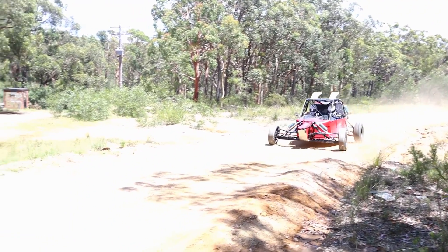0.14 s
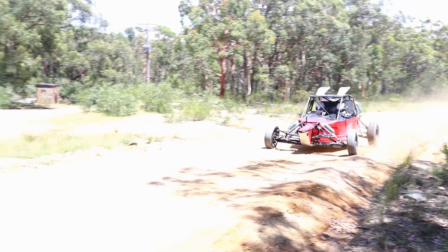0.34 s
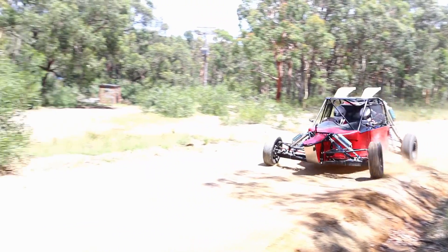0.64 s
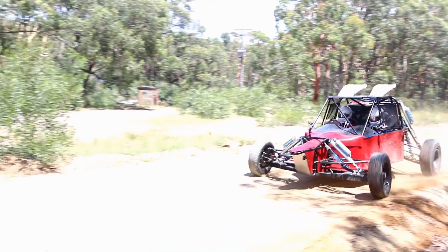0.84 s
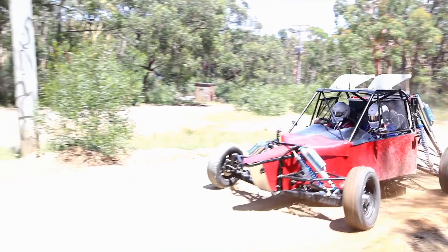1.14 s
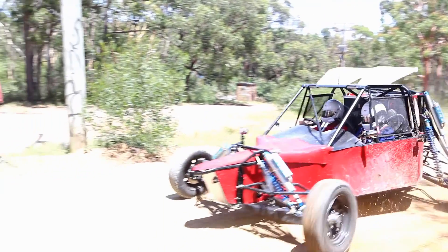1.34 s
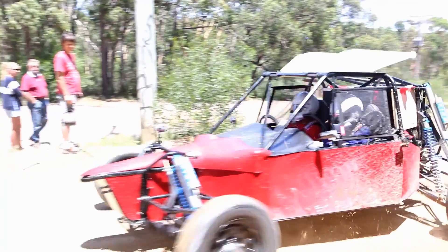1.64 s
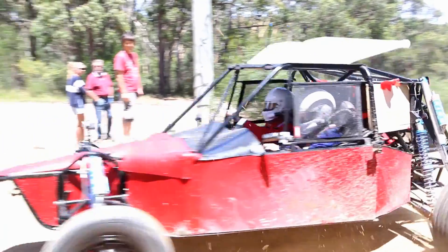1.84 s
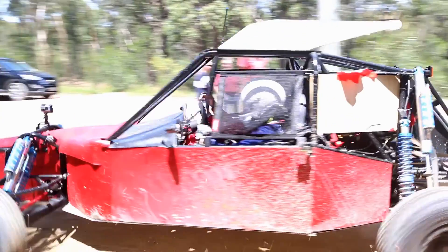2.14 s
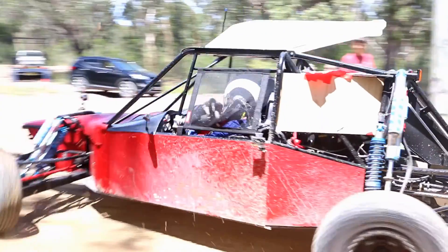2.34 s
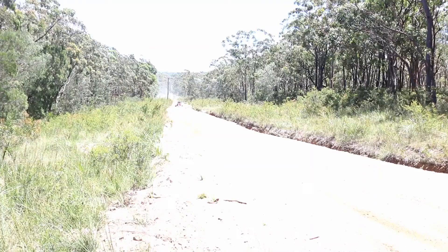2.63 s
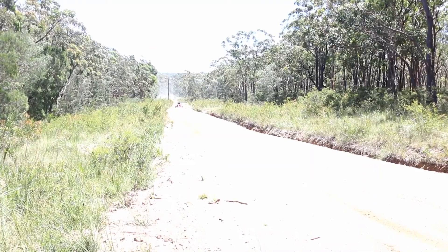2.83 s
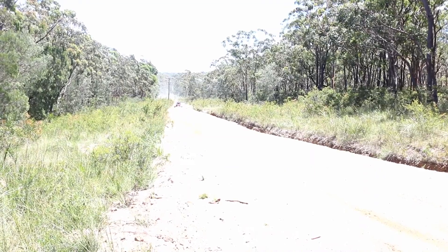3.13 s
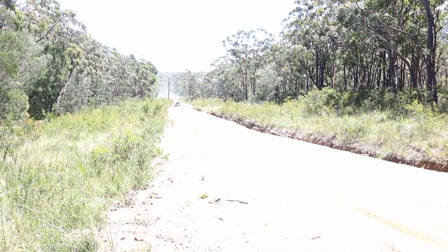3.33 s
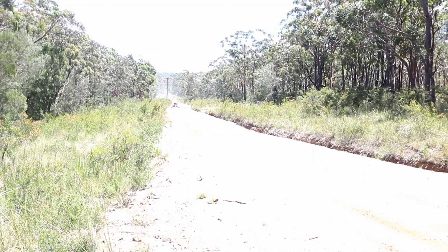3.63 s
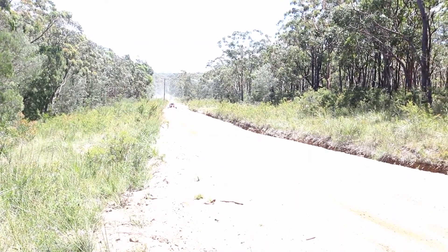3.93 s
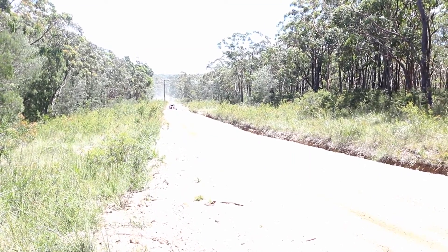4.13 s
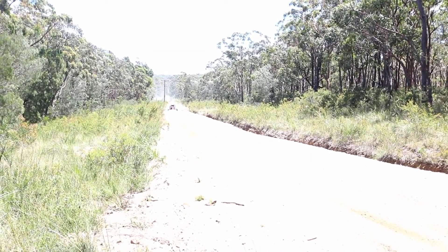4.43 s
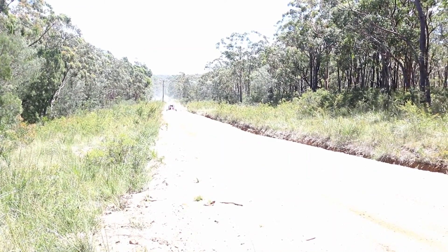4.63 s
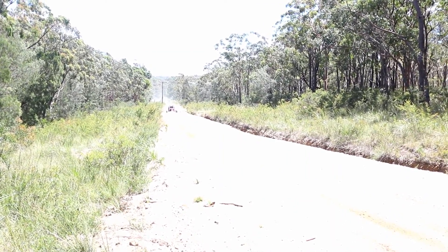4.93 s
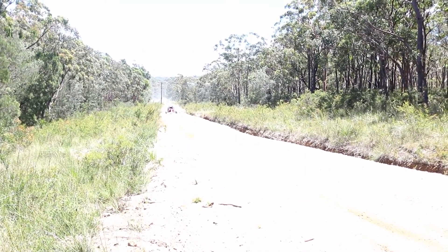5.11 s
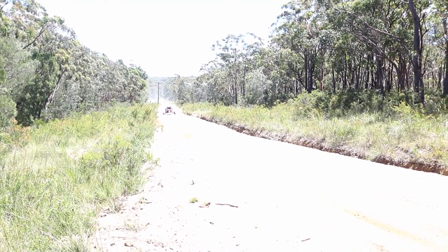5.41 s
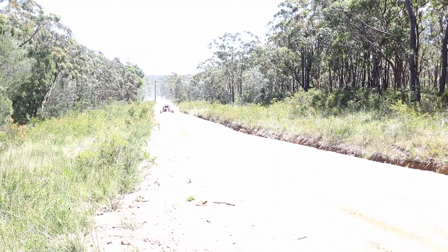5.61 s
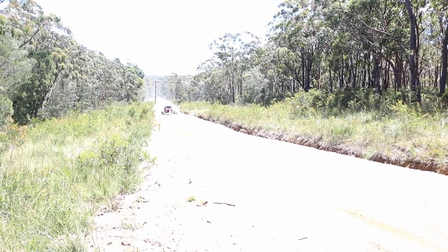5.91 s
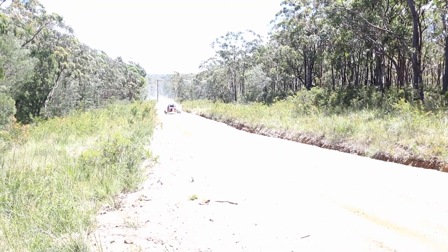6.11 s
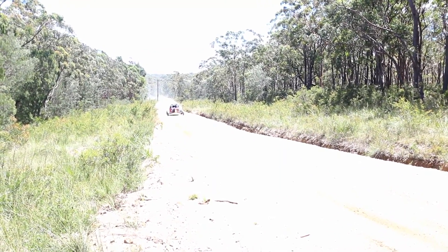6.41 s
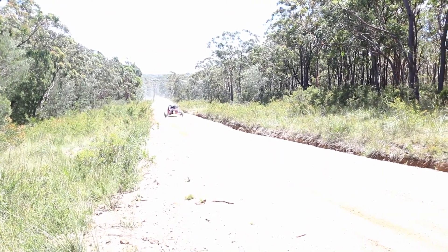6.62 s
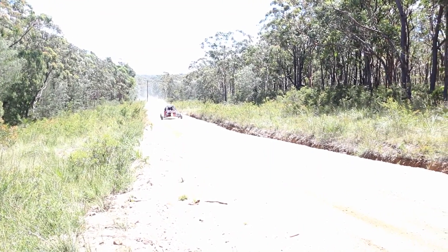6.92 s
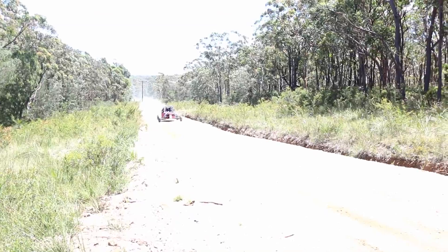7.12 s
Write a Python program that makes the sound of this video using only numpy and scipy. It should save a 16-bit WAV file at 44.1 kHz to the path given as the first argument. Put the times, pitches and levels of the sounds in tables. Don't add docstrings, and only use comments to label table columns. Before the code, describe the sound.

Outdoors on dirt, an eight-cylinder buggy coasts past a few metres from a stereo microphone pair, its low uneven exhaust falling in pitch. Tyres scrub and grab at ruts, stones tick on panels, a sharp throttle blip barks, brakes faintly squeal, then the engine pulls with tinny knocks. An abrupt cut leads to a distant engine revving high, shifting gear and approaching with tyre roar, faint insect rasps and a breeze.

```python
import sys
import numpy as np
from scipy import signal
from scipy.fft import rfft, irfft, next_fast_len
from scipy.io import wavfile
from scipy.ndimage import uniform_filter1d

SR = 44100
rng = np.random.default_rng(int(sys.argv[2]) if len(sys.argv) > 2 else 0)


def makeup_ratio(level_db):
    decades = np.asarray(level_db, float) / 20
    return 10 ** decades


def wav_out(sig):
    wavfile.write(sys.argv[1], SR, np.round(np.clip(np.atleast_2d(sig).T, -1, 1) * 32767).astype(np.int16))


N = 320166
T = np.arange(N) / SR
SCENE_CHANGE_S = 2.706

# time_s, engine_cycles_hz
NEAR_SPEED = [(0, 22.5), (.23, 21.5), (.4, 19.6), (.68, 16.2), (.89, 14.5), (1.0, 13.8), (1.12, 18.6),
              (1.19, 17.8), (1.46, 15.6), (1.78, 13.1), (2.26, 9.87), (2.64, 11.76)]
# time_s, load_0_to_1
NEAR_LOAD = [(0, 0), (.98, 0), (1, .4), (1.12, .4), (1.15, 0), (2.21, 0), (2.25, .8), (2.45, 1), (2.7, 1)]
# coasting_strength, pulling_strength, extra_pipe_delay_ms
NEAR_CYLINDERS = [(.64, .12, 1.56), (.08, .15, -2), (1.2, 1.1, 1.8), (.08, .55, .14), (.26, .25, 3.5),
                  (.03, .1, 0), (.53, .48, -1.9), (.31, .2, -3)]
FAR_CYLINDERS = [(1.05, 0, .9), (.55, .76, -.55), (.15, .9, .47), (.05, 1.2, -.39), (.2, .85, 0),
                 (.3, .96, -.14), (.3, .23, 0), (.45, .69, -.25)]
# frequency_hz, level_db
NEAR_PIPE = [(25, -48.5), (40, -47), (58, -22.5), (100, -17.5), (120, -5.5), (140, -0.5), (165, -2),
             (190, 0.5), (207, 0), (235, -11.5), (265, -12), (300, -19.5), (350, -28.5), (450, -34.5),
             (900, -68), (3000, -125)]
FAR_PIPE = [(40, -60), (70, -24.5), (100, -9), (125, -1.5), (150, 0), (195, 1), (250, 1), (300, 0.5),
            (350, -8.5), (420, -17.5), (500, -23), (600, -26.5), (900, -28), (1400, -78), (3500, -125)]
# frequency_hz, level_db
BANG_PIPE = [(40, -43), (100, -14), (150, -3), (185, -2.5), (212, 5.5), (245, -4.5), (320, -19), (500, -38),
             (3000, -125)]
# multiple_of_cycle_rate, level_under_exhaust_db
PULL_ORDERS = [
    (6, -18.5),
    (10, -34),
]
# frequency_hz, level_db
SCRUB = [(210, -35), (350, -7.5), (438, -23), (475, -20), (579, -13.5), (718, -3), (984, 1.5), (1050, 0.5),
         (1190, -16.5), (1460, -11.5), (1910, -19), (2270, -18.5), (3000, -27), (3900, -39), (6600, -120)]
DUST = [(180, -17), (330, 1), (740, -16), (1000, -12), (2070, -20), (4570, -23), (8300, -34), (11000, -46),
        (15500, -70)]
ROAR = [(240, -28.5), (400, -2.5), (448, -3.5), (517, -10), (622, -7.5), (863, -12), (4620, -30),
        (7940, -39.5), (12000, -63.5), (15600, -100), (22000, -120)]
# frequency_hz, level_db
AIR = [(12, -93), (20, -54), (95, -7.5), (144, -21), (202, -2), (315, -24.5), (549, -32.5), (667, -22),
       (15500, -84)]
WIND = [(15, -25), (40, -15), (75, 4), (110, -3), (200, -34.5)]
# frequency_hz, likeness_0_to_1
PORT_LIKENESS = [(30, .9), (125, .99), (700, .99), (1400, .96), (2800, .82), (5600, .6), (11000, .45)]
# frequency_hz, left_right_db
NEAR_BALANCE = [(500, 1.5), (2400, -1.5), (4400, -4), (8100, -8), (15000, -24.5)]
FAR_BALANCE = [(500, 2.5), (1300, 2), (4400, -3), (15000, -7.5)]
# peak_s, extra_db, rise_s, fall_s
GUSTS = [
    (2.87, 9.5, 0.075, 0.29),
    (4.899, 0.5, 0.4, 0.67),
    (6.8, 13, 0.54, .4),
]
# time_s, peak_db, ring_hz,
# left_right_db
STONES = [(0.0005, -47, 5770, -0.5), (0.1166, -66, 3740, -1.5), (0.145, -57, 3340, -1),
          (0.163, -44, 5430, 2), (0.219, -65.5, 3100, -8.5), (0.2373, -52.5, 3030, -7),
          (0.356, -50.5, 9020, -6.5), (0.3437, -47.5, 3050, -3), (0.375, -43.5, 5190, 1.5),
          (0.421, -43, 5040, 3), (0.4838, -40, 5480, 0), (0.5115, -45, 3060, -6), (0.535, -55.5, 3500, -6),
          (0.632, -55, 3070, -6), (0.649, -48.5, 7000, -3), (0.715, -53.5, 14800, -14),
          (0.7385, -60, 4730, -15.5), (0.702, -60.5, 3850, -16), (0.784, -56, 3150, -8),
          (0.9023, -43.5, 6920, -4.5), (0.9358, -56, 3320, -7), (0.9746, -57, 11950, -6.5),
          (1.04, -49.5, 3500, -9), (1.0152, -51.5, 3300, -12), (1.265, -45.5, 3590, -6),
          (1.3503, -48, 3600, -4), (1.539, -57, 4240, 6), (1.583, -58, 3020, -5), (1.594, -43.5, 4570, 4),
          (1.7029, -55.5, 4130, -3), (1.7249, -53.5, 3580, -6), (1.768, -51, 3110, -6),
          (1.911, -45.5, 6200, 6), (1.973, -46.5, 5060, 3.5), (2.156, -48.5, 5900, -6),
          (2.31, -52.5, 3450, -6), (2.3488, -55, 4410, -4), (2.498, -58, 4470, -14.5),
          (2.5414, -60, 7930, -11.5), (2.5889, -48.5, 4200, -11), (2.672, -53.5, 4240, -19),
          (2.704, -54, 2990, -3), (6.909, -66, 5800, 10.5), (6.999, -69.5, 6500, -16),
          (7.216, -58, 5950, 3)]
# start_s, length_s, scrub_db
SLIDES = [(0.207, 0.083, -44.5), (0.337, 0.2, -40), (0.66, 0.062, -42.5), (0.816, 0.13, -42.5),
          (0.988, 0.14, -44), (1.128, 0.16, -40.5), (1.319, 0.25, -44.5)]
# frequency_hz, peak_s, level_db, rise_s, fall_s
TREAD = [
    (1390, 0.46, -53, 0.46, 0.43),
    (457, 1.5, -52.5, 0.73, 0.21),
    (1000, 1.26, -49, 0.065, 0.13),
    (760, .38, -49, .15, .2),
]
# time_s, peak_db
GRABS = [(0.137, -49), (0.168, -38), (0.189, -45), (0.235, -34), (0.316, -36), (0.34, -27.5), (0.381, -27),
         (0.434, -32), (0.454, -25), (0.499, -27), (0.529, -37), (0.633, -32), (0.667, -28), (0.69, -34),
         (0.984, -33), (1.057, -35.5), (1.118, -36), (1.179, -28.5), (1.213, -26), (1.236, -26),
         (1.472, -34), (1.512, -31.5), (1.581, -39)]
# time_s, peak_db
BLIP_BANGS = [(0.999, -28), (1.02, -24.5), (1.038, -24), (1.054, -20.5), (1.069, -25), (1.082, -25),
              (1.091, -23.5), (1.097, -21), (1.11, -24), (1.117, -25)]
# time_s, frequency_hz, level_db
SQUEAL = [
    (1.7, 4770, -87.5),
    (1.78, 4660, -72),
    (2.14, 4640, -77),
    (2.2, 4590, -88),
    (2.32, 4330, -75),
    (2.7, 4300, -71),
]
# time_s, peak_db, ring_hz
KNOCKS = [(2.357, -51, 1010), (2.407, -49.5, 935), (2.456, -45.5, 1040), (2.498, -46.5, 1010),
          (2.541, -48.5, 953), (2.587, -43, 1096), (2.628, -40, 930), (2.671, -42, 894)]
# time_s, engine_cycles_hz
FAR_ENGINE_SPEED = [(2.71, 28.2), (2.93, 32.1), (3.15, 32.9), (3.47, 39.1), (3.54, 43.4), (3.68, 41.5),
                    (3.86, 44.8), (4.12, 41.5), (4.22, 29.7),
                    (4.38, 26.6), (4.56, 26.1), (4.68, 24.7), (5.08, 26.8), (5.51, 27.7), (5.7, 29.3), (6.1, 31.6),
             (6.28, 36.3), (6.55, 37), (6.66, 36.5), (6.81, 38.3), (6.94, 40.7), (7.26, 37.2)]
# time_s, load_0_to_1
FAR_LOAD = [(2.7, 1), (3.5, 1), (3.6, .7), (3.75, .7), (3.8, .08), (4.13, .08), (4.16, 1), (6.85, 1),
            (6.96, 0), (7.26, 0)]
# time_s, full_load_level_db
FAR_LEVEL = [(2.71, -49.5), (3.25, -49), (3.46, -46.5), (3.74, -48), (4.3, -50), (5.4, -42), (6.56, -35.5),
             (7.22, -39), (7.26, -44.5)]
# time_s, share_0_to_1
FAR_EVEN = [(2.7, .1), (4.3, .15), (5, .2), (5.4, .45), (6, .5), (6.5, .35), (6.85, .55), (6.96, 0)]
# time_s, spread_of_strength
FAR_ROUGH = [(2.7, .15), (4.5, .18), (4.7, .14), (5.7, .13), (6.2, .17), (6.9, .14), (7, .12)]
BUMPS = [5.71, 5.84, 5.97, 6.1, 6.21, 6.3, 6.43, 6.56, 6.7]
# start_s, end_s, level_db
THROTTLE_CUTS = [
    (3.594, 3.642, -15.5),
    (4.115, 4.133, -5),
]
# time_s, fourth_under_exhaust_db, fifth_under_exhaust_db
FAR_ORDERS = [(2.7, -7.5, -4), (3.3, -3, -8.5), (4.6, -13, -12), (5.3, -11, -17), (5.7, -15, -9.5),
              (6.5, -18, -14.5)]
# peak_s, extra_db, rise_s, fall_s
LOOSE = [
    (3.72, 8.5, 0.8, 0.39),
    (6.7, 10.5, 1.0, 0.51),
]

NEAR_LAG_S, FAR_LAG_S = 50e-6, -30e-6
ROLL_DB, GRIP_DB = -62, 7


def evened(x):
    return x / np.sqrt(np.mean(x ** 2) + 1e-20)


def smooth(x, size):
    return uniform_filter1d(uniform_filter1d(x, size), size)


def steady(x, size):
    power = smooth((x ** 2).mean(0), size)
    return x / np.sqrt(abs(power) + 1e-20)


def curves(rows):
    s, *columns = np.transpose(rows)
    return [np.interp(T, s, c) for c in columns]


def hump(peak, rise, fall):
    distance = np.where(T < peak, (peak - T) / rise, (T - peak) / fall)
    return np.cos(np.pi / 2 * np.clip(distance, 0, 1)) ** 2


def swells(rows):
    return sum(db * hump(s, rise, fall) for s, db, rise, fall in rows)


def tone(order, cycles):
    return np.sin(2 * np.pi * order * cycles)


def read(points, hz):
    f, value = np.transpose(points)
    return np.interp(np.log(hz + 1), np.log(f + 1), value)


def causal(x, spectrum, size=16384):
    db = np.maximum(read(spectrum, abs(np.fft.fftfreq(size, 1 / SR))), -130)
    log_gain = db * np.log(10) / 20
    taps = np.fft.ifft(np.exp(np.conj(signal.hilbert(log_gain)))).real[:size // 2]
    return signal.oaconvolve(x, taps)[:N]


def impulse_response(spectrum):
    return causal(1. * (T == 0), spectrum)


def noise(spectrum, balance, lag, seconds, patchy_db, flicker_db):
    frames, hz = int(seconds * SR) // 256 + 5, np.fft.rfftfreq(1024, 1 / SR)
    a, b, c, d, patches = rng.standard_normal((frames, 513, 5)).T
    patches = evened(uniform_filter1d(uniform_filter1d(patches, 8, 0), 6, 1))
    same = np.clip(read(PORT_LIKENESS, hz), -1, 1)[:, None]
    left = a + 1j * b
    delay = np.exp(2j * np.pi * hz * lag)[:, None]
    right = same * left * delay + np.sqrt(1 - same ** 2) * (c + 1j * d)
    tilt = makeup_ratio(read(balance, hz) / 2)[:, None]
    colour = makeup_ratio(read(spectrum, hz)[:, None] + patchy_db * patches)
    z = np.array([left * tilt, right / tilt]) * colour
    x = signal.istft(z, nperseg=1024, noverlap=768)[1][:, :N]
    flicker = evened(smooth(rng.standard_normal(x.shape[1]), 300))
    x = evened(x * makeup_ratio(flicker_db * flicker))
    return np.pad(x, ((0, 0), (0, N - x.shape[1])))


def firings(speed, load, cylinders, start, rough, even=0):
    strokes = 8 * (np.cumsum(speed) / SR + start)
    at = np.flatnonzero(np.diff(np.floor(strokes))) + 1
    coasting, pulling, ms = np.array(cylinders)[strokes[at].astype(int) % 8].T
    pulling = pulling + (even * np.ones(N))[at] * (pulling.mean() - pulling)
    chance = (rough * np.ones(N))[at] * rng.standard_normal(4000)[:len(at)]
    late = (ms * SR / 1000).astype(int)
    train = np.zeros(N)
    train[np.clip(at + late, 0, N - 1)] = (1 - load[at]) * coasting + load[at] * pulling + chance
    return train


def exhaust(train, pipe, wet_db, t60, size):
    echoes = rng.standard_normal((2, 9000)) * makeup_ratio(-60 * T[:9000] / t60)
    spread = .06 * echoes[1]
    echoes = np.array([echoes[0] - spread, echoes[0] + spread]) / np.linalg.norm(echoes[0])
    length = next_fast_len(N + 18000)
    paths = 1 + makeup_ratio(wet_db) * rfft(echoes, length)
    wet = irfft(rfft(causal(train, pipe), length) * paths / abs(paths), length)[:, :N]
    return makeup_ratio([[.25], [-.25]]) * steady(wet, size)


def puffs(train, seconds):
    r = np.exp(-1 / (seconds * SR))
    return evened(signal.lfilter([1], [1, -r], abs(train)))


def near_exhaust_db(speed, pulling):
    db = -40 + 0.45 * (speed - 15) + 8.5 * pulling
    db += 3 * np.sqrt(hump(1.204, 0.18, 0.11))
    db += 2 * hump(1.52, 0.11, 0.81)
    return db + 3 * hump(1.846, 0.34, 0.34)


def near_engine(speed, load, train):
    pulling = load * (T > 2)
    cycles = np.cumsum(speed) / SR
    blip = uniform_filter1d(1. * ((T > .995) & (T < 1.13)), 300)
    pipe_db = near_exhaust_db(speed, pulling)
    engine = makeup_ratio(pipe_db - 12 * blip) * exhaust(train, NEAR_PIPE, wet_db=-9, t60=.2, size=4000)
    engine += makeup_ratio(pipe_db - 19 - 8 * load) * tone(4, cycles)
    engine += pulling * makeup_ratio(pipe_db) * sum(makeup_ratio(db) * tone(k, cycles) for k, db in PULL_ORDERS)
    hum_db = np.interp(T, [.3, .6, 1.9, 2.2], [-20, -9, -5, -7])
    engine += (1 - load) * (1 - blip) * makeup_ratio(pipe_db + hum_db) * tone(11, cycles)
    return engine


def tyres(load, train):
    rise, fall = 221, 233
    slides = [db - rise * np.maximum(s - T, 0) - fall * np.maximum(T - s - length, 0)
              for s, length, db in SLIDES]
    drive = hump(2.648, 0.61, .3)
    rolling = ROLL_DB + GRIP_DB * drive - 3 * (T < .2)
    scrub_db = np.max(slides + [rolling], axis=0)
    dust_db = -66 + 0.3603 * (scrub_db - ROLL_DB) + 10.5 * drive
    scrub = makeup_ratio(scrub_db - 1.5) * noise(SCRUB, NEAR_BALANCE, NEAR_LAG_S, 2.75, patchy_db=1.5, flicker_db=0.6)
    lugs = rng.random(N) < 110 / SR
    scrub = scrub * (0.8 + 0.24 * uniform_filter1d(puffs(lugs, .003), size=60))
    dust = makeup_ratio(dust_db + 8.0) * noise(DUST, NEAR_BALANCE, NEAR_LAG_S, 2.75, patchy_db=2.5, flicker_db=2.0)
    pulling = load * (T > 2)
    spit = uniform_filter1d(puffs(1. * (train > .42), .009), 60)
    return (1 - .55 * pulling + .12 * pulling * spit) * (scrub + dust)


def tread():
    # frequency_ratio, level_db
    shape = np.array([(.3, -100), (.7, -40), (.9, -4), (1, 0), (1.1, -4), (1.4, -40), (3, -100)])
    out = np.zeros((2, N))
    for hz, s, db, rise, fall in TREAD:
        band = noise(shape * [hz, 1], NEAR_BALANCE, NEAR_LAG_S, 3.1, patchy_db=3.5, flicker_db=1.0)
        out += makeup_ratio(db) * hump(s, rise, fall) * band
    return out


def still_air():
    return makeup_ratio(-89.5) * noise(AIR, FAR_BALANCE, FAR_LAG_S, 6.3, patchy_db=-3.0, flicker_db=1.0)


def breeze(fade):
    wind = noise(WIND, FAR_BALANCE, 0, 8.3, patchy_db=4, flicker_db=2.5)
    wind[1] = 0.16 * wind[1] + 0.17 * wind[1, ::-1]
    return makeup_ratio(-82.5 + 10 * (1.5 - fade) + swells(GUSTS)) * wind


def stones():
    out, t = np.zeros((2, N)), np.arange(1300) / SR
    for (s, db, hz, pan_db), (grit, rattle) in zip(STONES, rng.standard_normal((60, 2, 1300))):
        ring = np.sin(2 * np.pi * hz * t) * makeup_ratio(-60 * t / .025)
        crack = np.diff(grit, prepend=0) * makeup_ratio(-60 * t / .03)
        tail = np.diff(rattle, prepend=0) * makeup_ratio(-60 * t / .06)
        tick = .3 * ring + .5 * crack + .22 * tail
        part = out[:, round(s * SR):][:, :1300]
        part += makeup_ratio(db + np.array([[.5], [-.5]]) * pan_db) * tick
    left = signal.lfilter(*signal.butter(2, 6500, fs=SR), out[0])
    return signal.lfilter(*signal.butter(2, 7500, fs=SR), [left, out[1]])


def grabs():
    train = np.zeros(N)
    for (s, db), grit in zip(GRABS, rng.standard_normal((30, 3000))):
        train[round(s * SR):][:3000] += makeup_ratio(db - 4 - 60 * T[:3000] / 0.084) * grit
    return causal(train, SCRUB) / np.linalg.norm(impulse_response(SCRUB)) / 2


def bangs():
    train = np.zeros(N)
    for s, db in BLIP_BANGS:
        train[round(s * SR)] = makeup_ratio(db)
    return causal(train, BANG_PIPE) / abs(impulse_response(BANG_PIPE)).max()


def squeal(speed):
    hz, db = curves(SQUEAL)
    waver = 1 + (.008 + .012 * (T > 2.25)) * evened(uniform_filter1d(rng.standard_normal(N), 300))
    throb = 1 + .9 * np.cos(2 * np.pi * 4 * np.cumsum(speed) / SR)
    whistle = np.sin(2 * np.pi * np.cumsum(hz * waver) / SR)
    return makeup_ratio(db) * throb * whistle * makeup_ratio([[-1.5], [1.5]]) * (T > 1.7)


def knocks():
    out, t = np.zeros(N), T[:4000]
    spit_band = signal.butter(2, [1000, 5500], "bandpass", fs=SR)
    for (s, db, hz), gas in zip(KNOCKS, rng.standard_normal((12, 4000))):
        can = 1.85 * np.sin(2 * np.pi * hz * t) + 0.29 * np.sin(2 * np.pi * 1.49 * hz * t)
        ring = makeup_ratio(-60 * t / 0.053) * np.minimum(t / 0.0011, 1) * can / 2
        spit = signal.lfilter(*spit_band, gas) * makeup_ratio(-3.5 - 60 * t / 0.018)
        out[round(s * SR):][:4000] += makeup_ratio(db - 1) * (ring + spit)
    return out


def near():
    (speed,), (load,) = curves(NEAR_SPEED), curves(NEAR_LOAD)
    train = firings(speed, load, NEAR_CYLINDERS, start=.12, rough=.045)
    train[0] = 0.51
    engine = near_engine(speed, load, train) + bangs() + knocks()
    return engine + tyres(load, train) + tread() + grabs() + squeal(speed)


def flared(speed):
    bump = np.interp(T, BUMPS, np.arange(len(BUMPS)))
    flare = 1 + .032 * np.sin(np.pi * bump / bump[-1]) ** .5 * np.cos(2 * np.pi * bump)
    flare += .006 * evened(smooth(rng.standard_normal(N), 3000))
    return speed * flare


def far_engine(speed, turning, load, train):
    (pipe_db,) = curves(FAR_LEVEL)
    cut_db = uniform_filter1d(sum(db * ((T > a) & (T < b)) for a, b, db in THROTTLE_CUTS), 150)
    level = makeup_ratio(pipe_db - 5.5 * (1 - load) + cut_db)
    cycles = np.cumsum(turning) / SR
    engine = level * exhaust(train, FAR_PIPE, wet_db=-8, t60=.25, size=2500)
    engine += load * level * sum(makeup_ratio(db) * tone(k, cycles) for k, db in enumerate(curves(FAR_ORDERS), 4))
    howl = np.exp(-((16 * speed - 445) / 55) ** 2) * tone(16, cycles)
    return engine + load * level * makeup_ratio(-18) * howl


def tyre_roar(train):
    roar_db = -74 + 2.5 * (T - SCENE_CHANGE_S) + swells(LOOSE)
    gate = 0.69 + 0.091 * puffs(train, 0.0016)
    roar = noise(ROAR, FAR_BALANCE, FAR_LAG_S, 7.3, patchy_db=0.95, flicker_db=-0.4)
    return makeup_ratio(roar_db + 4.5) * gate * roar


def insect():
    # frequency_hz, level_db; then frequency_hz, left_right_db
    band = [(5000, -37), (6800, -16.0), (8200, -12.5), (10000, -17), (12000, -50.5)]
    balance = [(100, 3.5), (9000, 3.9)]
    rasp = noise(band, balance, FAR_LAG_S, 7.2, patchy_db=-2.5, flicker_db=0.5)
    start_s, every_s, length_s = 2.9, 1.355, .26
    since = (T - start_s) % every_s
    return rasp * makeup_ratio(-83) * np.sin(np.pi * np.clip(since / length_s, 0, 1)) ** 2


def far():
    (speed,), (load,) = curves(FAR_ENGINE_SPEED), curves(FAR_LOAD)
    (rough,), (even,) = curves(FAR_ROUGH), curves(FAR_EVEN)
    turning = flared(speed)
    train = firings(turning, load, FAR_CYLINDERS, start=.3, rough=rough, even=even)
    return far_engine(speed, turning, load, train) + tyre_roar(train) + insect()


def scene():
    fade = np.clip((T - SCENE_CHANGE_S) / .002, 0, 1)
    buggy = (1 - fade) * near() + fade * far()
    return buggy + still_air() + breeze(fade) + makeup_ratio(5.5) * stones()


def starve(x):
    threshold_db, spread_db, lowest_hz = -63.5, 4.5, 2500
    hz, _, z = signal.stft(x, SR, nperseg=1024, noverlap=512)
    power = (abs(z) ** 2).mean(0)
    share = abs(uniform_filter1d(power, 24, 0)) / (power.sum(0) + 1e-20)
    under_db = 10 * np.log10(share + 1e-20)
    count = len(power[0])
    hunger = np.repeat(rng.standard_normal(count), 2)[:count]
    keep = 1 / (1 + np.exp(np.clip(threshold_db + spread_db * hunger - under_db, -30, 30)))
    z = z * np.where(hz[:, None] > lowest_hz, keep, 1)
    return signal.istft(z, SR, nperseg=1024, noverlap=512)[1][:, :N]


def roll_off(x):
    return signal.sosfilt(signal.butter(12, 15700, fs=SR, output="sos"), x)


def record(dry):
    mix = starve(dry)
    return roll_off(mix)


dry = scene()
out = record(dry)
wav_out(out)
```